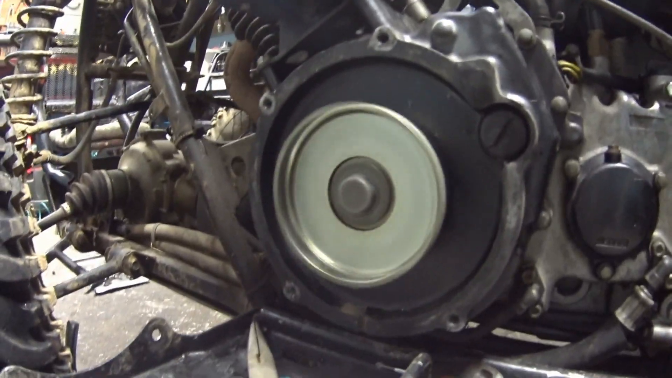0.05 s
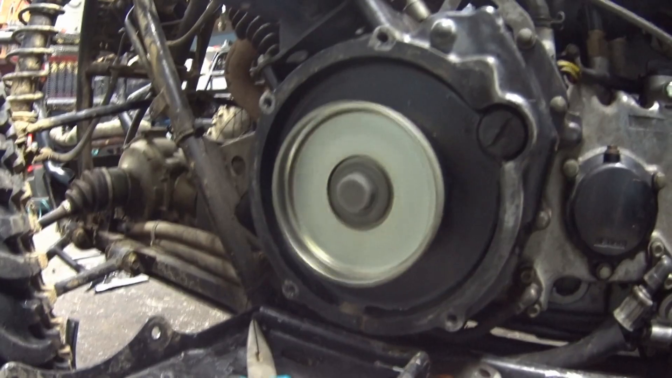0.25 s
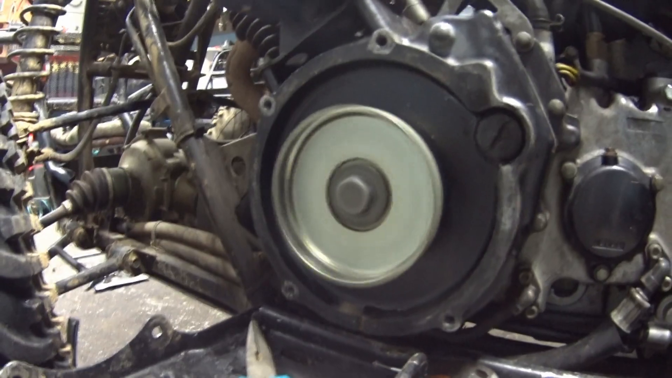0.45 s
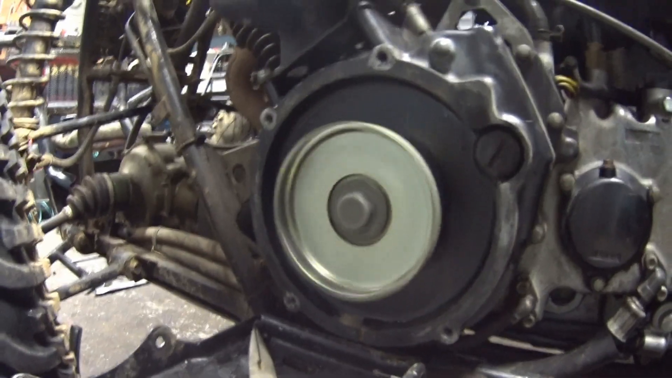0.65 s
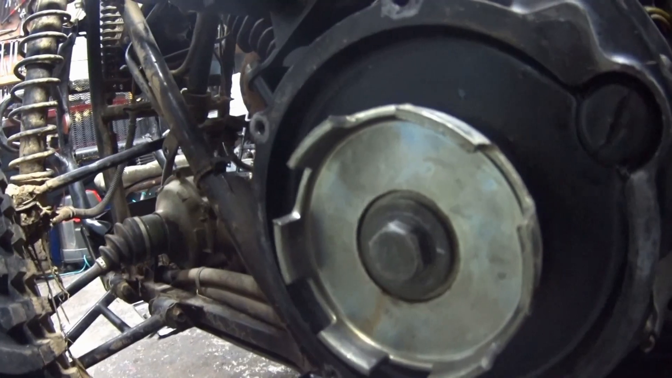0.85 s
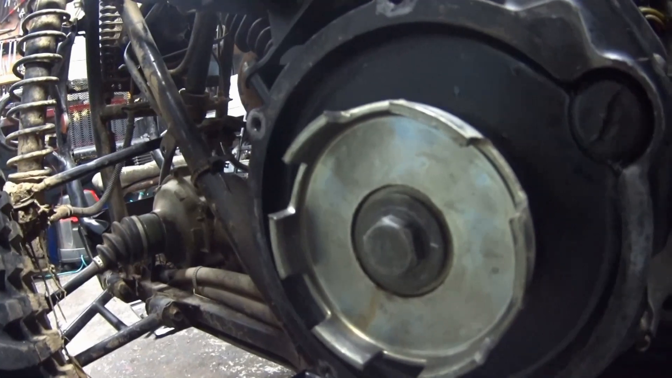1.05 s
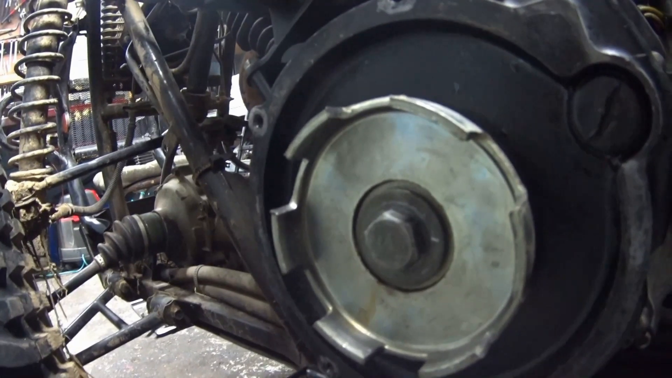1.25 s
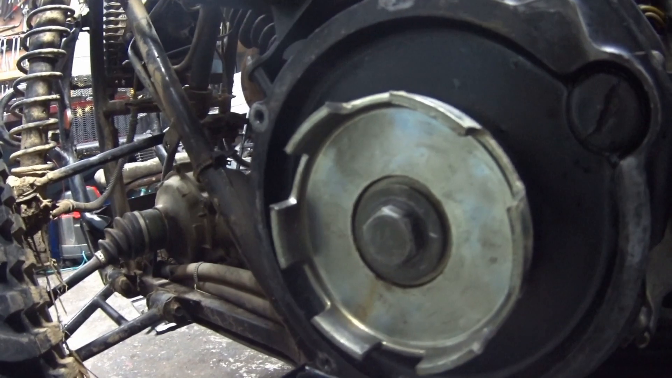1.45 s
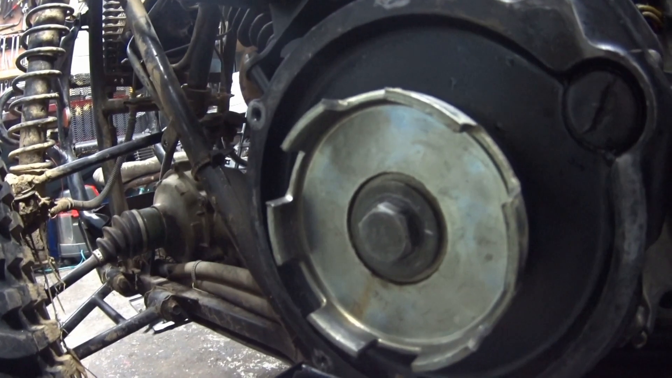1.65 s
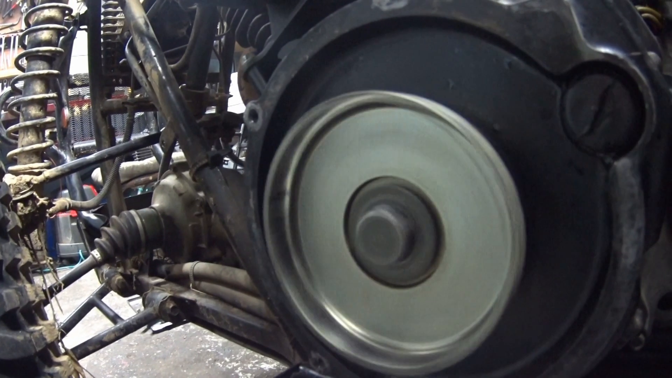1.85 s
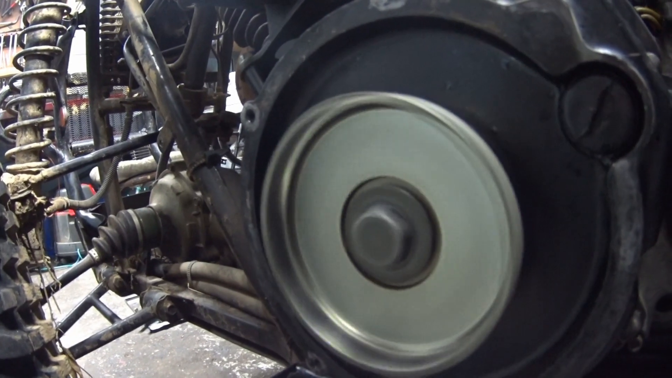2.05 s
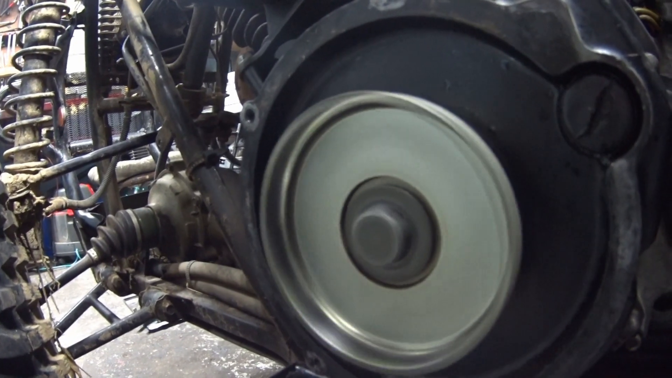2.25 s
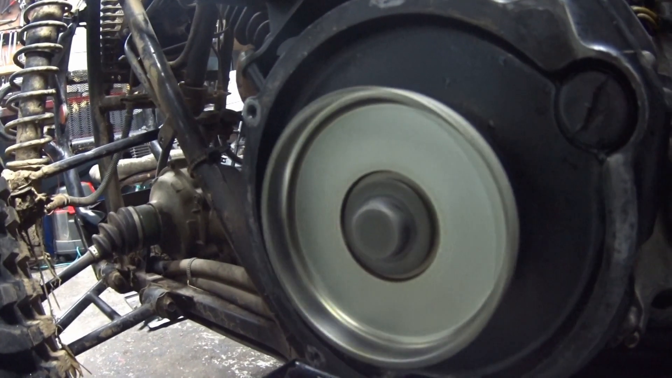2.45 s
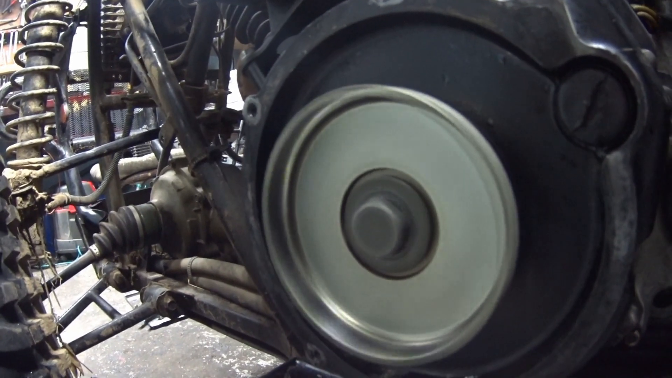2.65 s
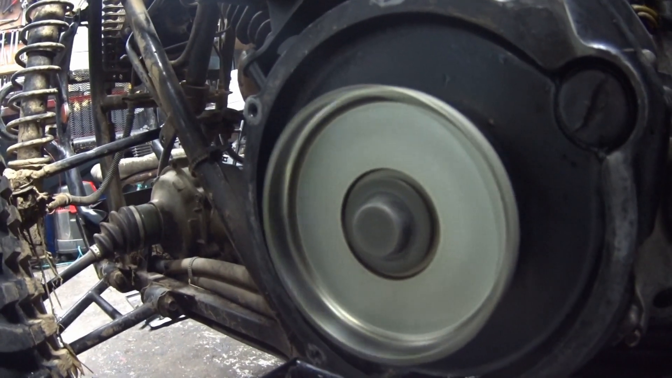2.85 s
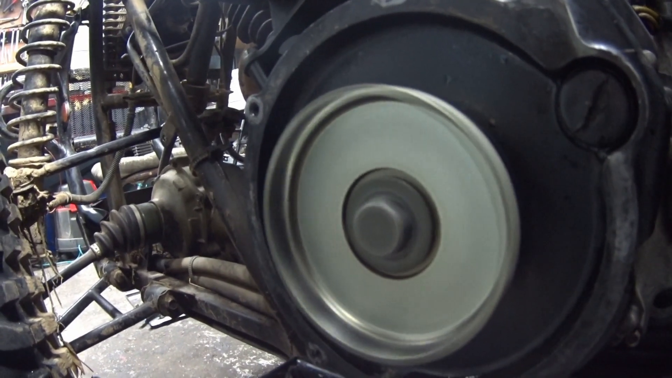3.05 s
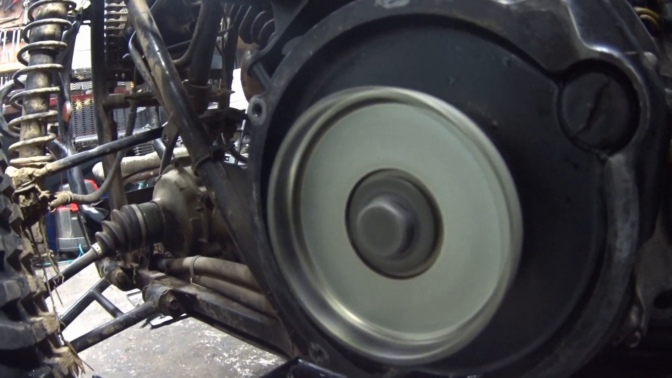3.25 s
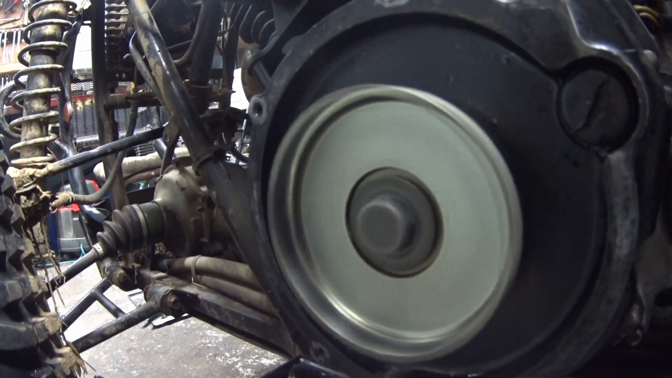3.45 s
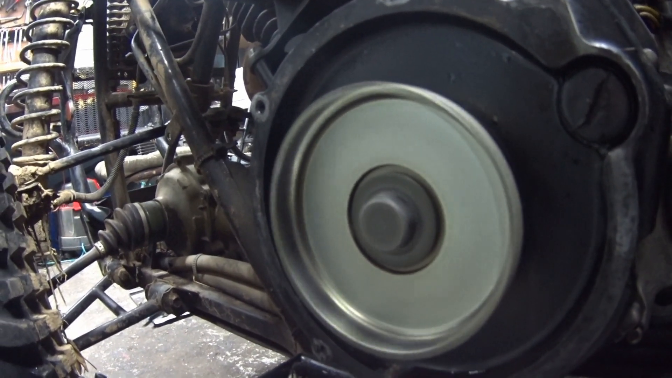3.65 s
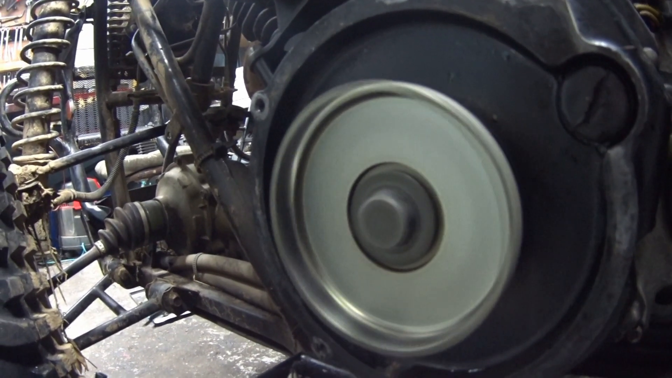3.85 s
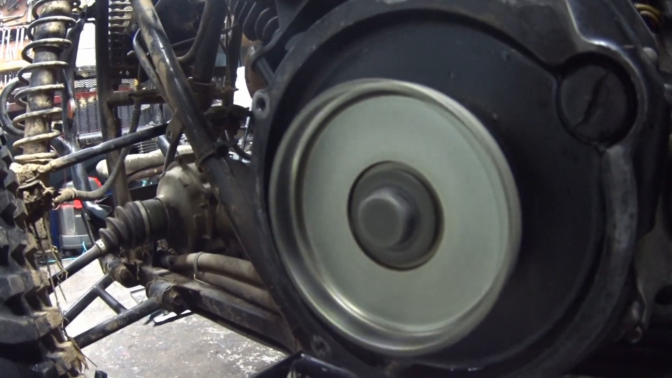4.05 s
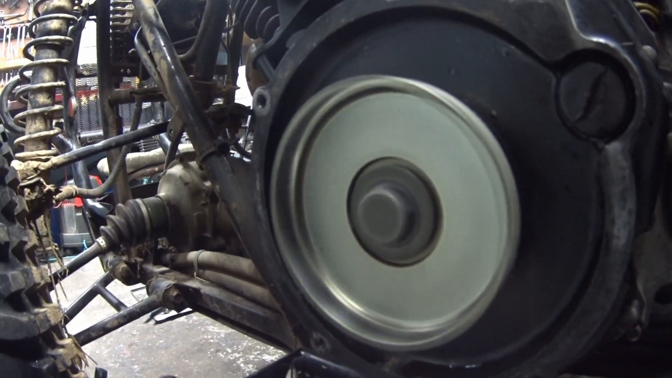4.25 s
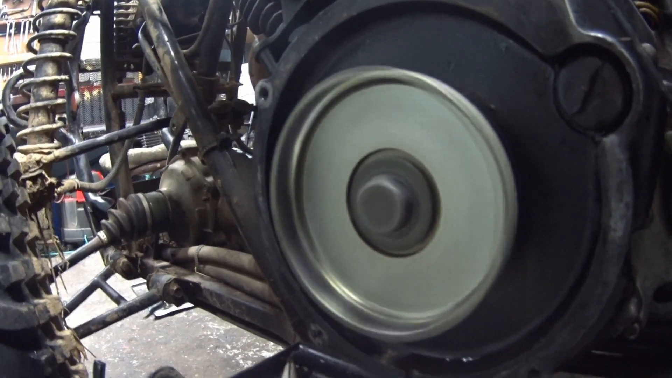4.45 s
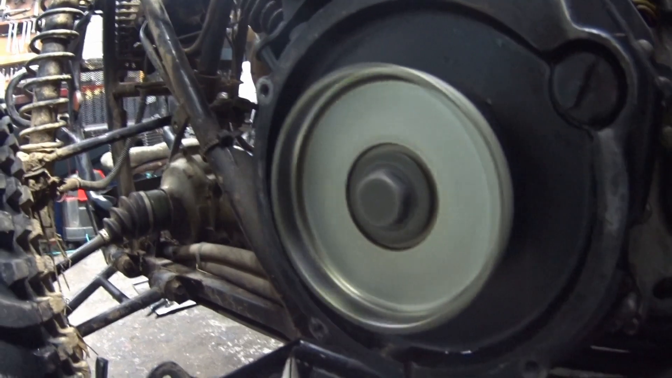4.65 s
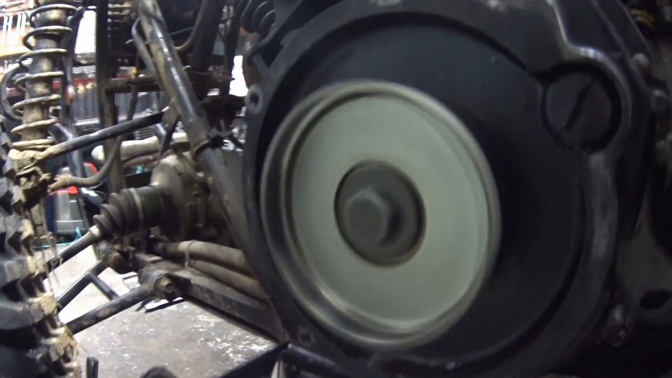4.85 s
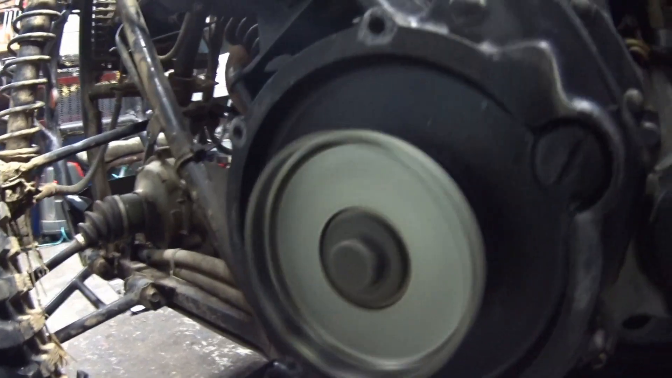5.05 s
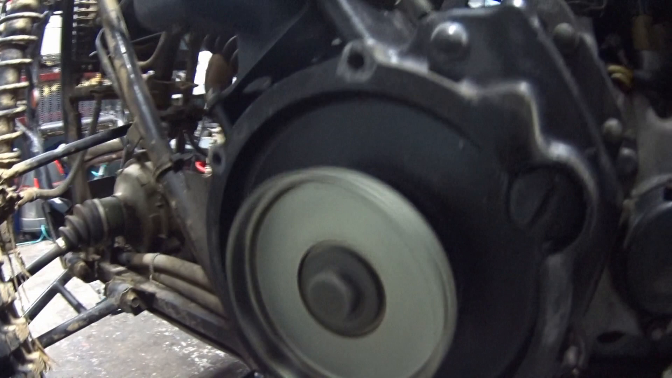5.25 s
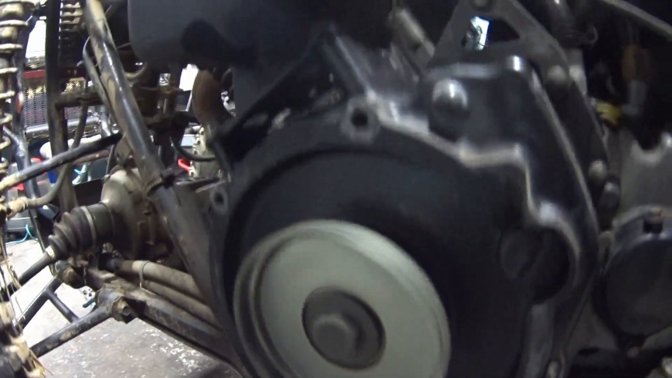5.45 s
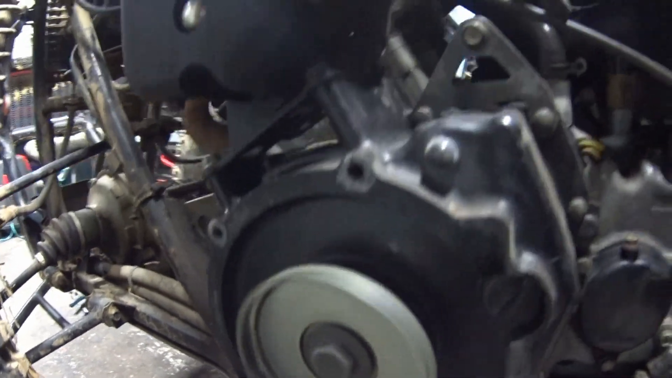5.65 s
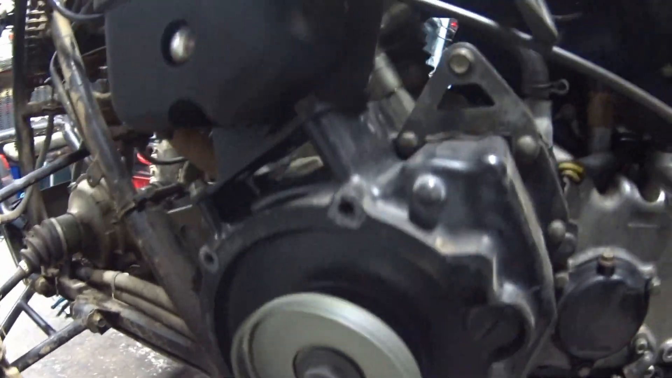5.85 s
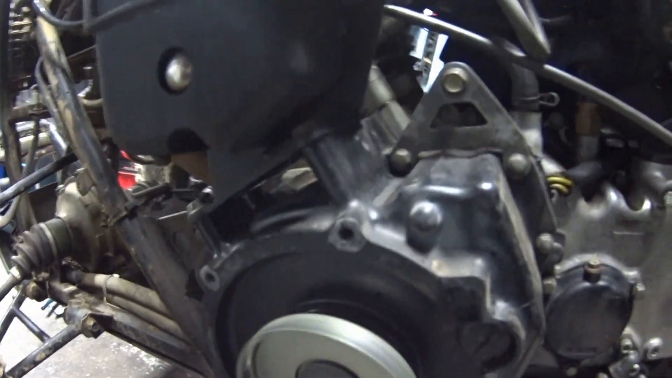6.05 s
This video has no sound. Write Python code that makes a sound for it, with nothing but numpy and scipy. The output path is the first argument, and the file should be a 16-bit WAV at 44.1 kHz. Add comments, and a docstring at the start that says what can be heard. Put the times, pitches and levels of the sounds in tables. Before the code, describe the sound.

A single-cylinder four-stroke quad engine idles close to the microphone in a garage, with booming exhaust pulses, tapping valves and a faint metallic ring. It breaks off abruptly. In the brief lull a switch clacks twice over low handling rumble and soft bumps. An electric starter grinds and whines, the engine catches almost at once, the starter gears clash free, and a slightly uneven idle carries on, slowly growing louder.

```python
"""A single-cylinder four-stroke quad engine idles close by in a garage, then breaks off abruptly.
In the lull a switch clacks twice over low handling rumble. The electric starter grinds and whines, the
engine catches, the starter gears clash free, and the idle goes on, slowly growing louder.
Firings set pipe and room booming; valves tap, piston and gears knock, the flywheel pings."""
import sys
import numpy as np
from scipy import signal
from scipy.io import wavfile
from scipy.ndimage import uniform_filter1d

SR = 44100
rng = np.random.default_rng(int(sys.argv[2]) if len(sys.argv) > 2 else 0)


def generate_wav(signal):
    """Clip the signal to [-1, 1] and save it as 16-bit WAV at the path in sys.argv[1]."""
    frames = np.transpose(np.atleast_2d(signal))
    scaled = np.clip(frames, -1, 1) * 32767
    pcm = np.round(scaled).astype(np.int16)
    wavfile.write(sys.argv[1], SR, pcm)


N = 269451
TIME = np.arange(N) / SR
BREAK_S, LULL_S, STARTER_S, CATCH_S = 0.739, 0.783, 1.818, 2.039
# idle before the break
IDLE_START_S, IDLE_FIRING_HZ = -0.007, 8.594
IDLE_EXHAUST_DB, IDLE_CLATTER_DB, IDLE_SINGING_DB = -18, -21, -23.5

# handling rumble and room hiss spectrum: f/Hz, level/dB
RUMBLE_SPECTRUM = [(12, -20), (24, -6), (38, 2), (60, -7), (90, -7.5), (125, -19), (200, -30.5),
                   (400, -44.5), (750, -45.5), (1300, -49.5), (2500, -51), (4000, -55.5), (4700, -54.5),
                   (6000, -57.5), (11000, -64.5)]
# soft bumps: t/s, level/dB, f/Hz
BUMPS = [(1.138, -24, 128), (1.468, -10.5, 113)]
# dry ticks: t/s, level/dB
TICKS = [(.979, -25.5), (1.783, -19.5)]
# switch clacks: t/s, level/dB
CLACKS = [(0.847, -24.5), (1.044, -34.5)]
# switch lever modes, one list per clack: f/Hz, level/dB, t60/s
LEVER_MODES = [
    [(770, -18, 0.35), (1386, -2.5, 0.2), (1670, -16, 0.19), (2920, -4, 0.1), (3330, 0, 0.14),
     (5200, -18, .14), (7560, -8, .06)],
    [(1205, -1.5, 0.38), (1366, 3, 0.18), (1854, 12, .12), (2385, 2, 0.27), (3560, 1.5, 0.22),
     (4280, -3, 0.2)],
]

# flywheel modes: f/Hz, level/dB, t60/s
FLYWHEEL_MODES = [(2834, 1.5, .13), (2843, -5, 0.15), (2650, -6, .05), (2412, -1.5, 0.044),
                  (3030, -23, 0.076), (4350, -21, 0.035), (7170, -32, 0.11)]
# knocks that ping the flywheel: phase/cycle, level/dB
PING_KNOCKS = [(.22, -23), (.69, -17.5)]

# starter grind, swelling under load, dying as the engine overruns it: t/s, level/dB
GRIND_LEVELS = [(1.82, -17), (1.95, -14.5), (2.6, -15.5), (2.9, -21.5), (3.12, -22.5), (3.18, -30),
                (3.6, -28), (3.9, -39.5)]
# starter grind spectrum: f/Hz, level/dB
GRIND_SPECTRUM = [(180, -25), (300, -18), (388, -13), (524, -15), (720, -8.5), (1370, -5), (1880, -1.5),
                  (2130, -7.5), (2290, -0.5), (2550, -5.5), (2790, -1), (4590, -11.5), (6790, -11.5),
                  (8390, -8), (11000, -22.5), (14300, -68), (22000, -120)]
# starter drive resonances: f/Hz, width/Hz, level/dB
DRIVE_RESONANCES = [(392.4, 8.6, 11), (1900, 340, -9.5), (2490, 64, -22), (2803, 10, 12.5), (3040, 41, 2.5),
                    (3300, 39, 1), (3750, 115, -1), (3980, 96, 1.5), (7020, 4.2, 2)]
# starter gear tone, sagging against compression: t/s, f/Hz, level/dB
WHINE = [(1.819, 640, -40), (1.866, 752, -19), (1.919, 952, -18), (1.959, 1080, -27), (1.984, 1240, -23),
         (2.005, 1153, -11), (2.028, 1097, -40), (2.071, 1510, -27), (2.12, 1550, -50)]
# starter gear clashes: t/s, level/dB
CLASHES = [(1.818, -16), (2.475, -18), (2.603, -13), (2.653, -11), (2.723, -12), (2.771, -10), (2.816, -7),
           (2.837, -12), (2.899, -12), (2.94, -11), (2.966, -5), (2.988, -17), (3.035, -9), (3.086, -5),
           (3.138, -6), (3.188, -9.5)]
# modes of the clashing gears: f/Hz, level/dB, t60/s
TOOTH_MODES = [(1520, -5, .07), (1865, 11.5, 0.072), (1890, 1, 0.084), (2250, -7, 0.064), (3140, -15, .08),
               (3970, -13, 0.079), (5210, -17, 0.77), (7160, -1, 0.13)]
# starter clutch squeals: t/s, level/dB, decay/s
SQUEALS = [(2.993, -23, .012), (3.066, -25.5, 0.047)]

# hunting speed after the restart: t/s, firing rate/Hz
FIRING_RATES = [(2.04, 10.44), (2.25, 8.11), (3.01, 7.93), (3.14, 9.46), (3.41, 7.67), (3.73, 9.6),
                (3.87, 8.1), (4.4, 8.88), (4.79, 7.64), (5.12, 8.81), (5.54, 8.57), (6.1, 9.66)]
# engine levels after the restart: t/s, exhaust/dB, machinery/dB
RESTART_LEVELS = [(2.04, -25.5, -34), (2.3, -31, -34), (3.1, -34.5, -30), (3.3, -28, -31),
                  (3.7, -27, -27.5), (5.2, -21.5, -22.5), (6.1, -19.5, -19.5)]
# valve train taps: phase/cycle, level/dB, decay/s
VALVE_TAPS = [(.265, -10, 0.011), (0.587, 1.5, 0.0026), (.62, -5.5, 0.0086), (.965, -9, 0.011)]
# valve tap spectrum: f/Hz, level/dB
TAP_SPECTRUM = [(500, -0.5), (2000, -0.5), (3400, 1.5), (4300, 8), (5100, -1.5), (7000, 0), (8000, 4),
                (9500, 0.5), (11000, -6)]
# piston and gear knocks: phase/cycle, level/dB, decay/s
KNOCKS = [(.07, -5, 0.037), (0.268, -3.5, 0.0039), (.655, 6, 0.0035), (0.689, 2.5, 0.0076),
          (0.745, 0, 0.007), (0.888, 2.5, 0.0082)]
# knock spectrum: f/Hz, level/dB
KNOCK_SPECTRUM = [(300, -15), (700, 4.5), (1050, -0.5), (1400, -3.5), (1800, 2), (2150, -3), (2560, 6.5),
                  (3100, -5), (4000, -15), (6000, -27.5), (11000, -44)]
# chain and gear whirr spectrum: f/Hz, level/dB
WHIRR_SPECTRUM = [(200, 0.5), (330, -8.5), (480, -4), (780, 0), (1050, -4), (1400, 3.5), (1800, 1.5),
                  (2150, -1.5), (2600, -0.5), (3200, -3.5), (4000, -15), (5500, -14), (7000, -13.5),
                  (8000, -9), (10500, -23.5)]
# crankcase resonances: f/Hz, width/Hz, level/dB
CASE_RESONANCES = [(338.3, 18, 9.5), (386, 11, 9.5), (607.6, 7.9, 4), (717, 15, 1), (771, 19, -3),
                   (1226, 18, 5.5), (1351, 122, 3.5), (7980, 110, 2)]
# exhaust boom in pipe and garage, per firing: f/Hz, level/dB, arrival/s, swell/s
BOOM_MODES = [(162.9, 3, -0.0049, 0.014), (245.3, 1, .0206, 0.013), (105.6, 0.5, 0.04024, 0.019),
              (134.4, -5.5, .005, 0.0077), (90, 4, .006, 0.0068), (58, -15.5, 0.0072, 0.051),
              (196.4, -3, 0.028, 0.011), (345.5, -1.5, -.0003, 0.0063), (324, -7, .018, 0.014)]


def amp(db):
    """dB to gain."""
    return 10 ** (np.asarray(db) / 20)


def unit(x):
    """Scale to rms 1."""
    return x / np.sqrt(np.mean(x ** 2) + 1e-20)


def add(track, at_s, sound):
    """Mix a sound in at at_s."""
    at = int(round(at_s * SR))
    part = track[max(at, 0):max(at + len(sound), 0)]
    part += sound[max(-at, 0):][:len(part)]


def colour(x, spectrum):
    """Minimum-phase filter, unit power gain; rows: f/Hz, level/dB."""
    hz, db = np.transpose(spectrum)
    bins_hz = abs(np.fft.fftfreq(4096, 1 / SR))
    log_gain = np.log(amp(np.interp(np.log(bins_hz + 1), np.log(hz), db)))
    taps = np.fft.ifft(np.exp(np.conj(signal.hilbert(log_gain)))).real
    return signal.oaconvolve(x, taps / np.linalg.norm(taps))[:N]


def ring(x, resonances):
    """Parallel resonators; rows: f/Hz, width/Hz, level/dB."""
    return sum(amp(db) * signal.lfilter(*signal.iirpeak(hz, hz / width_hz, SR), x)
               for hz, width_hz, db in resonances)


def grit(per_s):
    """Dense tiny metal contacts of random size."""
    return unit(rng.uniform(-1.08, 1, N) * (rng.random(N) < per_s / SR))


def wobble(samples):
    """Smoothed noise, rms 1."""
    return unit(uniform_filter1d(rng.standard_normal(N), size=samples))


def blow(decay_s, rise_s=0.0021):
    """Envelope of one blow."""
    t = TIME[:SR // 5]
    return (1 - np.exp(-t / rise_s)) * np.exp(-t / decay_s)


def struck(modes):
    """Struck metal, no two blows alike; rows: f/Hz, level/dB, t60/s."""
    t = TIME[:SR // 3]
    hz, db, t60_s = np.transpose(modes)[:, :, None]
    turns = hz * (1 + 0.0019 * rng.standard_normal(hz.shape)) * t + rng.random(hz.shape)
    partials = amp(db - 60 * t / t60_s) * np.sin(2 * np.pi * turns)
    return partials.sum(0) * (1 - np.exp(-t / 0.004))


def garage(x, left_db, wet_db, t60_s=0.22):
    """Pan a source and add wall reflections; treble dies sooner."""
    size = 16384
    echoes = rng.standard_normal((2, size)) * (rng.random((2, size)) < 0.1) * (TIME[:size] > 0.001)
    hz, t, bands = signal.stft(echoes, SR, nperseg=256)
    fade = amp(-60 * t * (1 + hz[:, None] / 14000) / t60_s) + 5.8 * np.exp(-t / 0.0024)
    tail = signal.istft(bands * fade, SR, nperseg=256)[1]
    tail /= np.linalg.norm(tail, axis=1, keepdims=True)
    wet = signal.fftconvolve(x[None], tail, axes=1)[:, :N]
    pan = amp([[left_db / 2], [-left_db / 2]])
    return (x + amp(wet_db) * wet) / np.sqrt(1 + amp(wet_db) ** 2 / 2) * pan


def cycles():
    """Engine cycles, steady then hunting: t/s, length/s, exhaust/dB."""
    idle_s = np.arange(IDLE_START_S, BREAK_S, 1 / IDLE_FIRING_HZ)
    idle = [(s, 1 / IDLE_FIRING_HZ, IDLE_EXHAUST_DB) for s in idle_s]
    t = CATCH_S + TIME
    count = np.cumsum(np.interp(t, *np.transpose(FIRING_RATES))) / SR
    firings_s = np.interp(np.arange(int(count[-1])), count, t)
    at_s, db, _ = np.transpose(RESTART_LEVELS)
    return idle + [(s, length_s, np.interp(s, at_s, db))
                   for s, length_s in zip(firings_s, np.diff(firings_s)) if s < TIME[-1]]


def clatter_db(s):
    """Machinery level at time s."""
    at_s, _, db = np.transpose(RESTART_LEVELS)
    return np.where(s < LULL_S, IDLE_CLATTER_DB, np.interp(s, at_s, db))


def rumble(handling_db=-28.5, rise_s=0.0067, fade_s=0.023):
    """Handling rumble fills the lull; a weaker one follows the restarted engine."""
    rise = 1 - np.exp(-np.maximum(TIME - LULL_S, 0) / rise_s)
    fade = np.exp(-np.maximum(TIME - STARTER_S, 0) / fade_s)
    gain = amp(handling_db) * rise * fade + amp(clatter_db(TIME) - 14.5) * (TIME > STARTER_S)
    mid, side = (unit(colour(noise, RUMBLE_SPECTRUM)) for noise in rng.standard_normal((2, N)))
    return gain * (mid + amp(-13) * np.array([side, -side]))


def bumps_and_ticks():
    """Soft low bumps and small ticks, close and dry."""
    sound, t = np.zeros(N), TIME[:SR // 3]
    for s, db, hz in BUMPS:
        swell = 3 * hz * t * np.exp(1 - 3 * hz * t)
        add(sound, s, -amp(db) * swell * np.sin(2 * np.pi * hz * t))
    for s, db in TICKS:
        add(sound, s, -amp(db) * np.exp(-t / 0.0041))
    return sound


def switch():
    """The contact chatters briefly, ringing the lever."""
    clacks = np.zeros(N)
    for (s, db), modes in zip(CLACKS, LEVER_MODES):
        chatter = blow(decay_s=0.0097, rise_s=0.0064) * rng.standard_normal(SR // 5)
        add(clacks, s, amp(db - 7.5) * struck(modes))
        add(clacks, s, amp(db + 16) * ring(chatter, [(hz, 200, mode_db) for hz, mode_db, _ in modes]))
        add(clacks, s, amp(db - 1.5) * chatter)
    return garage(clacks, left_db=0, wet_db=-1, t60_s=0.45)


def flywheel(spread_db=1.8):
    """Knocks and starter clashes ping the flywheel; shaking keeps it faintly singing."""
    pings = np.zeros(N)
    for s, length_s, _ in cycles():
        follow_db = 0.34 * (clatter_db(s) - IDLE_CLATTER_DB)
        for phase, db in PING_KNOCKS:
            gain = amp(db + follow_db + spread_db * rng.standard_normal())
            add(pings, s + phase * length_s, gain * struck(FLYWHEEL_MODES))
    for s, db in CLASHES:
        add(pings, s, amp(db - 16) * struck(FLYWHEEL_MODES))
    singing_db = np.where(TIME < LULL_S, IDLE_SINGING_DB, clatter_db(TIME) - 12)
    singing = unit(ring(grit(per_s=4300), [(2815, 20, 5.5), (2580, 1200, -18.5)]))
    return garage(pings + amp(singing_db) * singing, left_db=-2, wet_db=-13)


def starter_gears(engage_s=0.0029):
    """Gears grind under load, then clash as the engine overruns them."""
    force = amp(np.interp(TIME, *np.transpose(GRIND_LEVELS)) + 2 * wobble(samples=300))
    force *= np.exp(np.minimum(TIME - STARTER_S, 0) / engage_s)
    teeth = np.zeros(N)
    for s, db in CLASHES:
        add(force, s, amp(db - 4) * blow(decay_s=0.0071))
        add(teeth, s, amp(db - 17.5) * struck(TOOTH_MODES))
    grind = colour(force * grit(per_s=7000), GRIND_SPECTRUM)
    return amp(-3) * (grind + ring(grind, DRIVE_RESONANCES)) + teeth


def crank_shudder():
    """The crank jerks into motion with a dull shudder."""
    load = np.zeros(N)
    add(load, STARTER_S + 0.025, amp(-15) * blow(decay_s=0.044, rise_s=0.011))
    spectrum = [(40, -6), (150, -8), (330, -8.5), (700, 2), (1200, -3), (4000, -37)]
    return colour(load * rng.standard_normal(N), spectrum)


def starter_whine():
    """Three-harmonic gear tone; climbs, sagging against compression."""
    at_s, hz, db = np.transpose(WHINE)
    pitch_hz = np.interp(TIME, at_s, hz) * (1 + 0.028 * wobble(samples=60))
    angle = 2 * np.pi * np.cumsum(pitch_hz) / SR
    tone = amp(-10.5) * np.sin(angle) + np.sin(2 * angle) + amp(-13) * np.sin(3 * angle)
    return tone * amp(np.interp(TIME, at_s, db, left=-120, right=-120))


def clutch_squeal():
    """The starter clutch slips in short, high squeals."""
    slip = np.zeros(N)
    for s, db, decay_s in SQUEALS:
        add(slip, s, amp(db + 6.5) * blow(decay_s))
    return slip * unit(ring(rng.standard_normal(N), [(8570, 79, 0)]))


def machinery(jitter_s=0.001, spread_db=1.6):
    """Valves tap, piston and gears knock at set crank angles, over chain and gear whirr."""
    taps, knocks = np.zeros((2, N))
    for s, length_s, _ in cycles():
        for track, blows in ((taps, VALVE_TAPS), (knocks, KNOCKS)):
            for phase, db, decay_s in blows:
                late, uneven = rng.standard_normal(2)
                hit = amp(db + spread_db * uneven) * blow(decay_s, rise_s=0.003)
                add(track, s + phase * length_s + jitter_s * late, hit)
    whirr = colour(grit(per_s=6000), WHIRR_SPECTRUM)
    knocking = unit(colour(knocks * grit(per_s=6000), KNOCK_SPECTRUM))
    case = amp(-2.5) * whirr + amp(-3) * knocking
    case = unit(case + ring(case, CASE_RESONANCES))
    valves = unit(colour((unit(taps) + 0.2) * grit(per_s=9000), TAP_SPECTRUM))
    valves = unit(valves + ring(valves, [(4070, 46, 0), (4380, 25, 0.71)]))
    sound = amp(0.5) * garage(case, left_db=-3, wet_db=-2.5)
    sound += amp(-10) * garage(valves, left_db=1.3, wet_db=-8.5)
    return sound * amp(clatter_db(TIME))


def exhaust(detune=0.014, spread_db=1.1):
    """Each firing sets pipe and room booming, with a puff of turbulent gas and its echo."""
    boom, puffs = np.zeros((2, N))
    t = TIME[:SR // 5]
    for s, _, db in cycles():
        for hz, mode_db, arrival_s, swell_s in BOOM_MODES:
            drift, uneven = rng.standard_normal(2)
            swell = t / swell_s * np.exp(1 - t / swell_s)
            tone = np.sin(2 * np.pi * hz * (1 + detune * drift) * t)
            add(boom, s + arrival_s, amp(db + mode_db + spread_db * uneven) * swell * tone)
        add(puffs, s - 0.003, amp(db + 4) * blow(decay_s=0.0097))
        add(puffs, s + 0.014, amp(db - 1) * blow(decay_s=0.062, rise_s=0.0055))
    spectrum = [(25, -28), (50, -11), (125, 3), (200, -1.5), (340, -8), (480, -4), (900, -13),
                (3000, -46)]
    gas = colour(puffs * rng.standard_normal(N), spectrum)
    sound = garage(boom, left_db=-2, wet_db=-29) + amp(-3) * garage(gas, left_db=-10.5, wet_db=-5.5)
    sound[0] -= 0.35 * ring(sound[0], [(254, 114, 0)])  # weaker low mids on the left
    return sound


def scene():
    """Idle, a moment of silence, lull, restart."""
    running = uniform_filter1d(((TIME < BREAK_S) | (TIME > STARTER_S)) * 1.0, size=130)
    engine = (exhaust() + machinery() + flywheel()) * running
    starter = starter_gears() + crank_shudder() + starter_whine() + clutch_squeal()
    return engine + garage(starter, left_db=-1, wet_db=-6) + switch() + bumps_and_ticks() + rumble()


def record(dry):
    """Soft peak limit, then a steep low-pass."""
    ceiling, cutoff_hz = 0.85, 11080
    rounded = dry / (1 + (abs(dry) / ceiling) ** 6) ** (1 / 6)
    lowpass = signal.firwin(701, cutoff_hz, window=("kaiser", 8), fs=SR)
    return signal.oaconvolve(rounded, lowpass[None], "same")


dry = scene()
out = record(dry)
generate_wav(out)
```